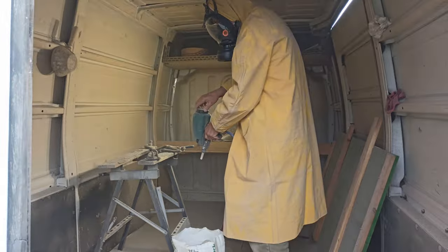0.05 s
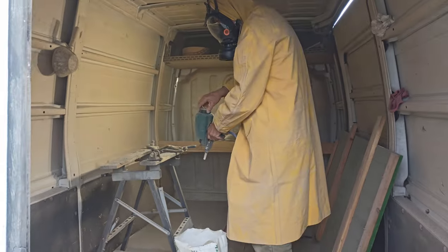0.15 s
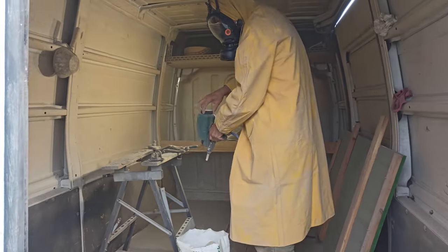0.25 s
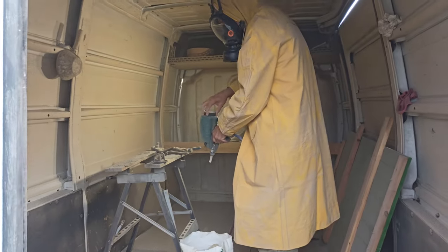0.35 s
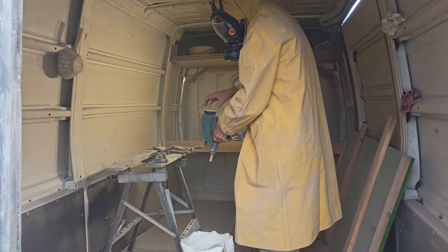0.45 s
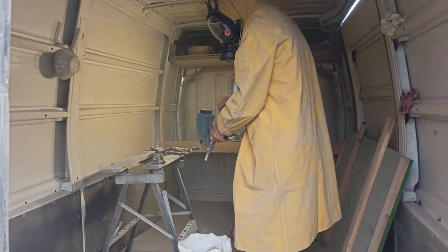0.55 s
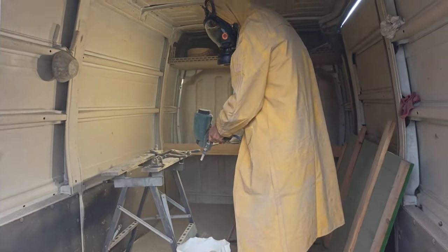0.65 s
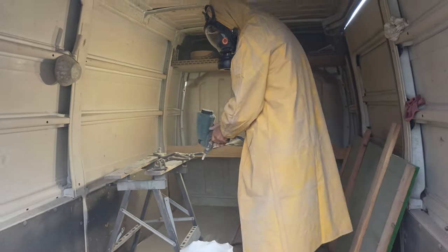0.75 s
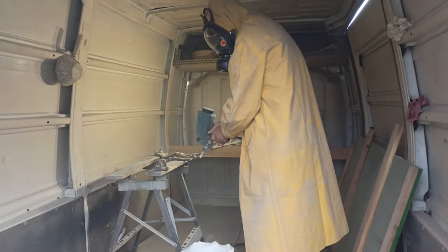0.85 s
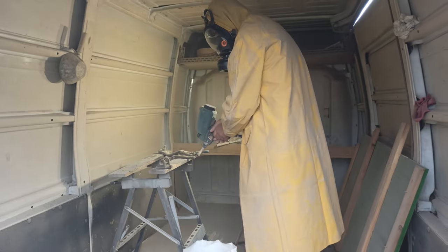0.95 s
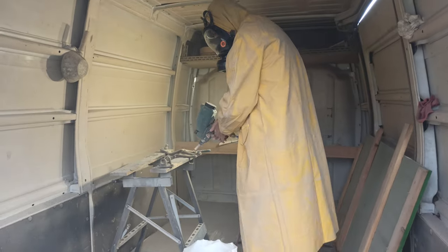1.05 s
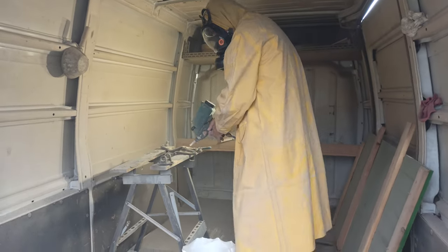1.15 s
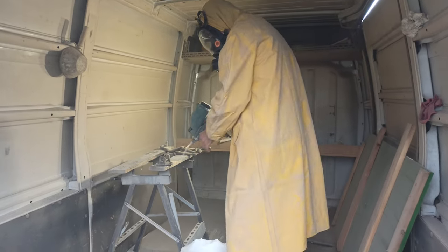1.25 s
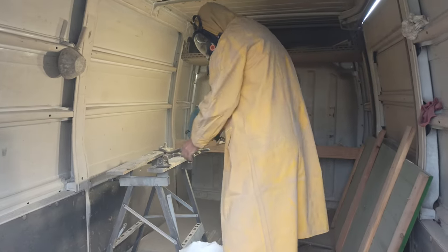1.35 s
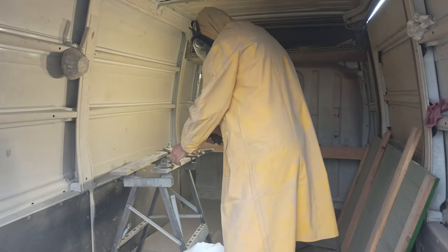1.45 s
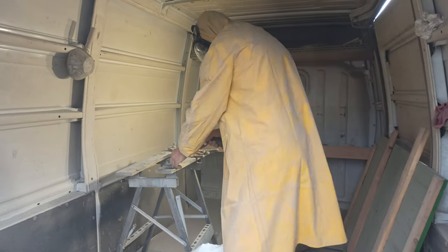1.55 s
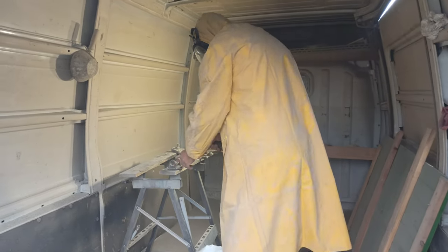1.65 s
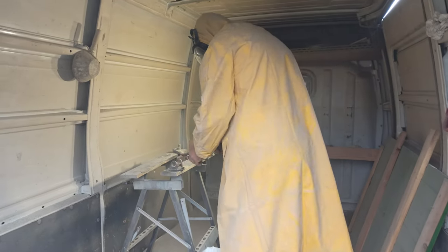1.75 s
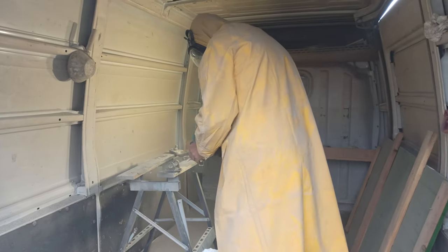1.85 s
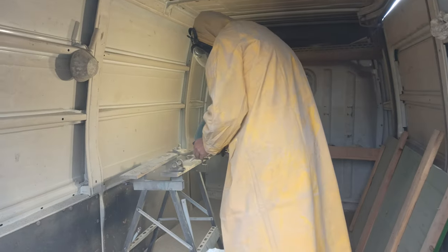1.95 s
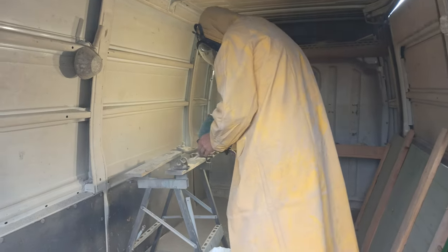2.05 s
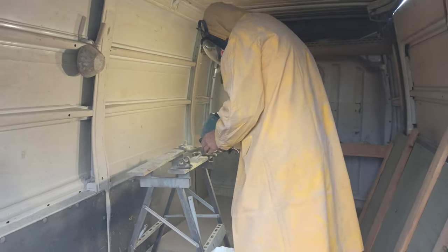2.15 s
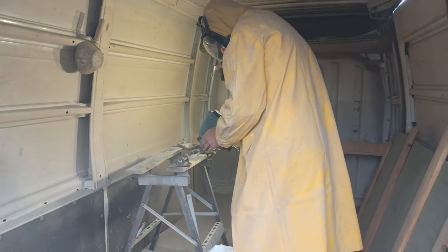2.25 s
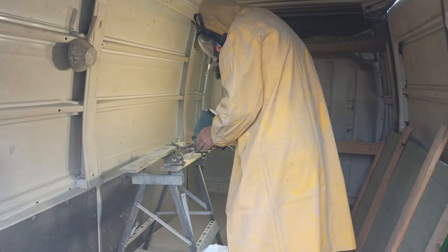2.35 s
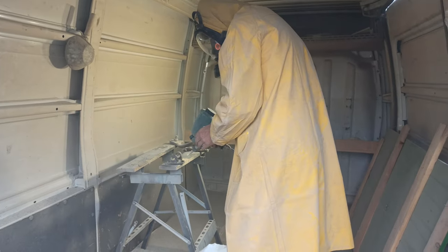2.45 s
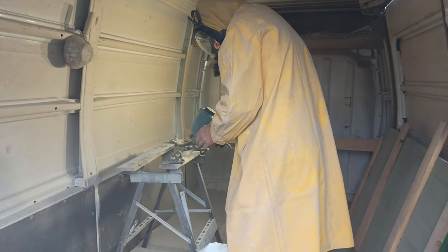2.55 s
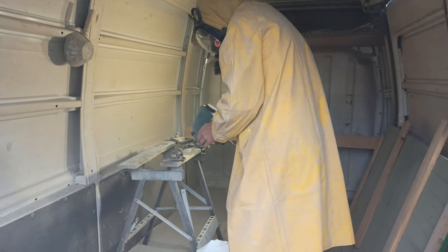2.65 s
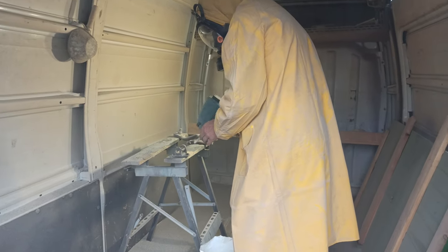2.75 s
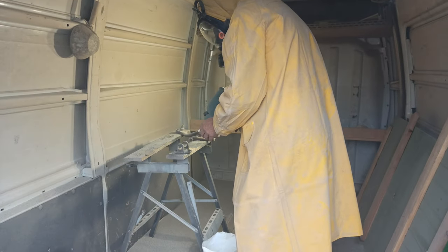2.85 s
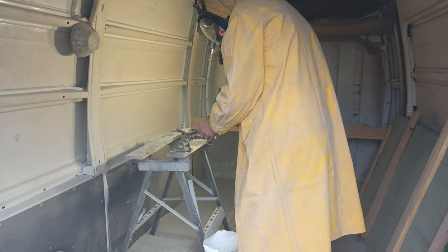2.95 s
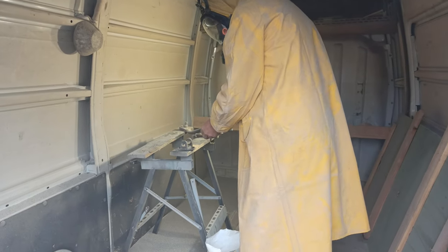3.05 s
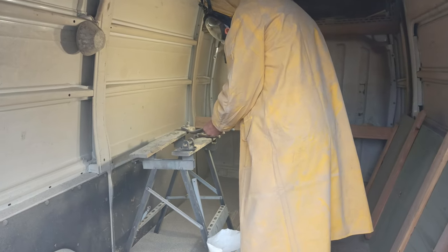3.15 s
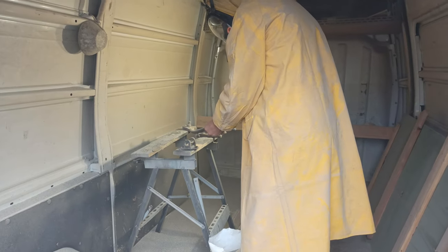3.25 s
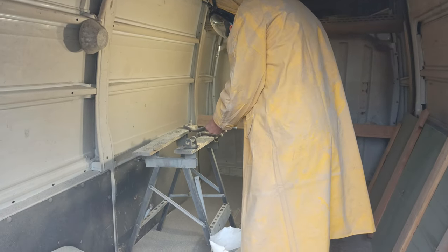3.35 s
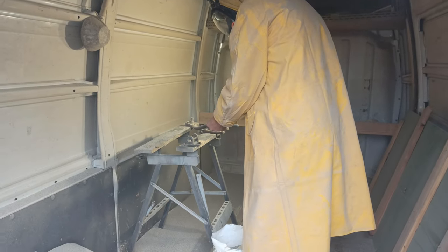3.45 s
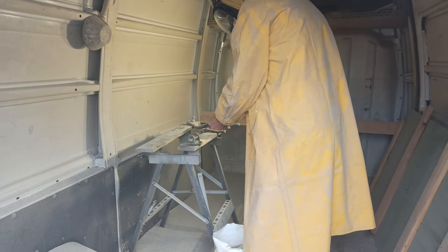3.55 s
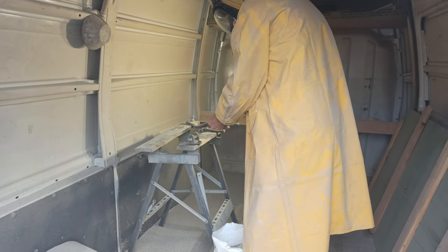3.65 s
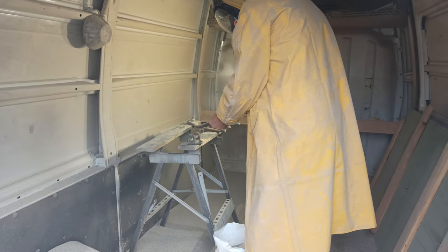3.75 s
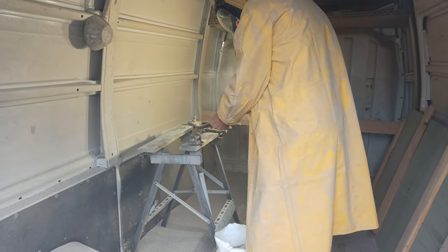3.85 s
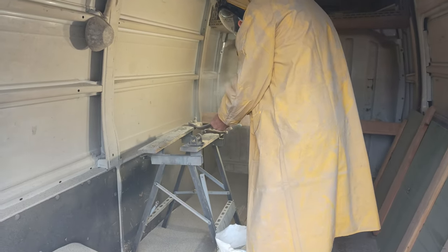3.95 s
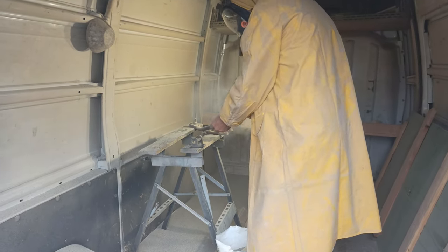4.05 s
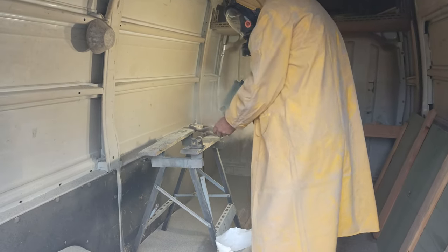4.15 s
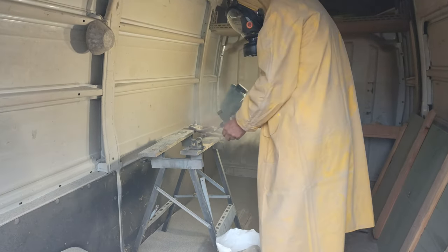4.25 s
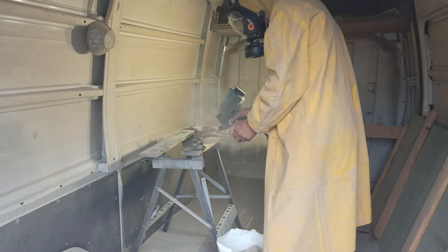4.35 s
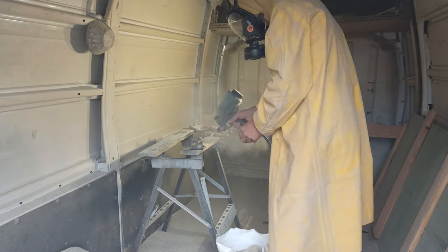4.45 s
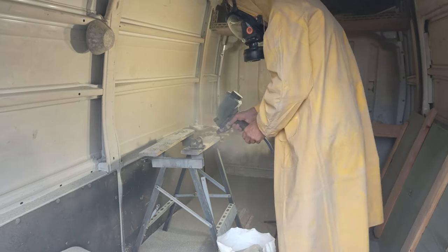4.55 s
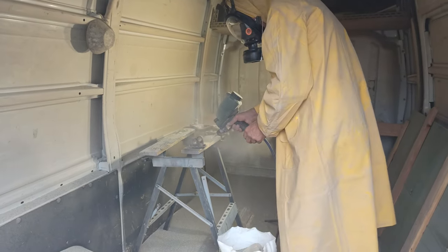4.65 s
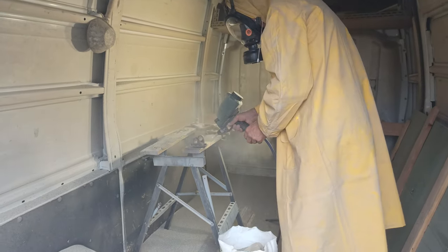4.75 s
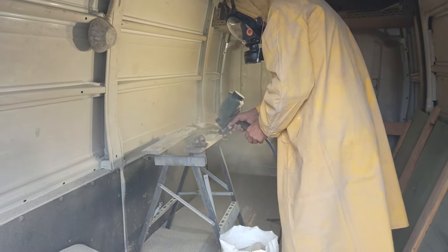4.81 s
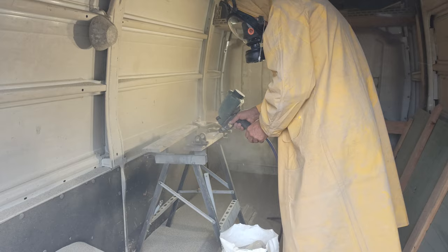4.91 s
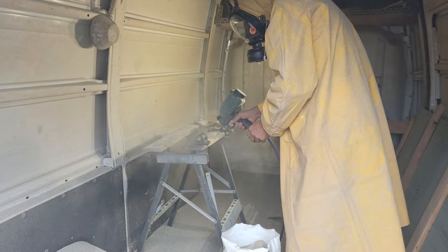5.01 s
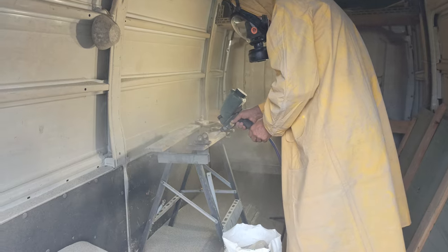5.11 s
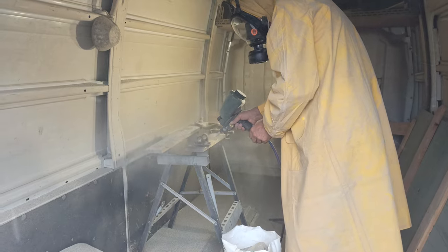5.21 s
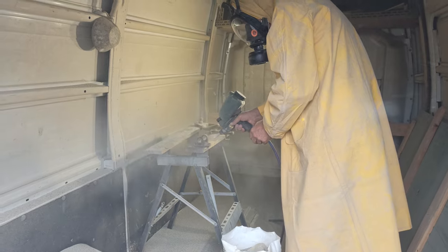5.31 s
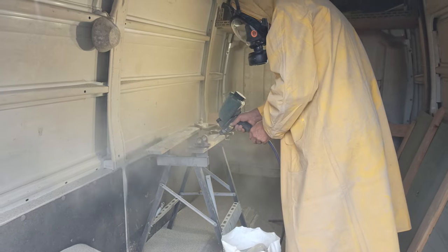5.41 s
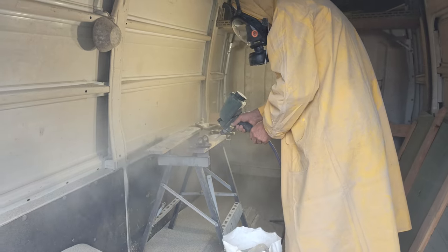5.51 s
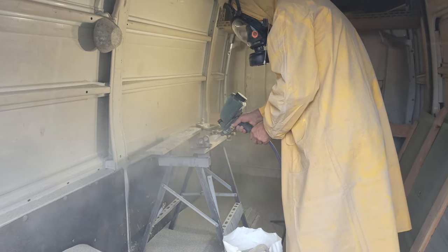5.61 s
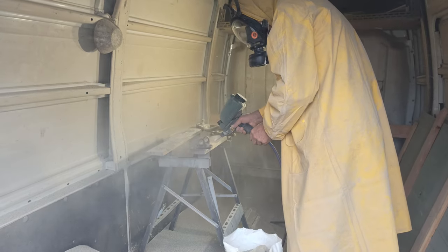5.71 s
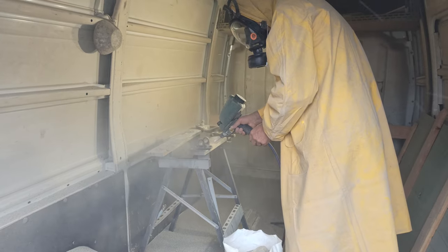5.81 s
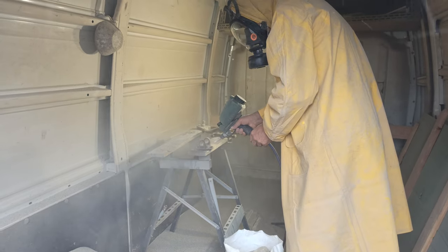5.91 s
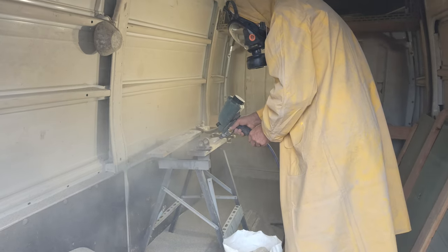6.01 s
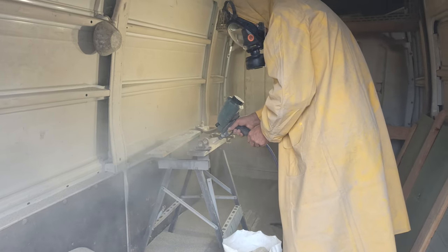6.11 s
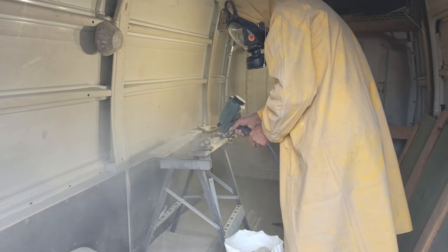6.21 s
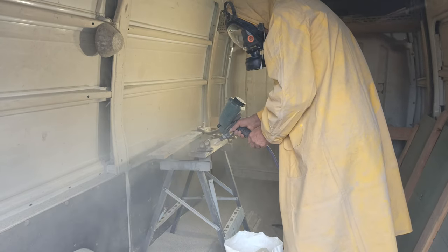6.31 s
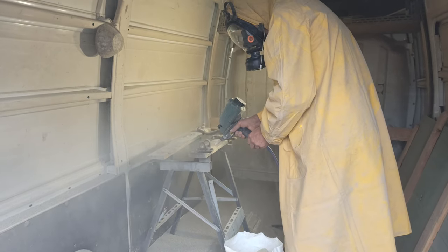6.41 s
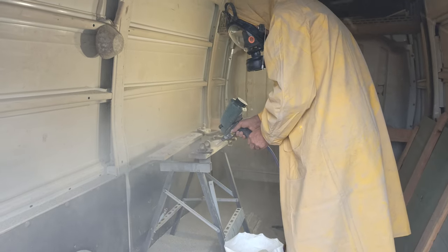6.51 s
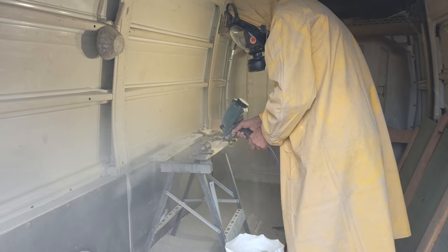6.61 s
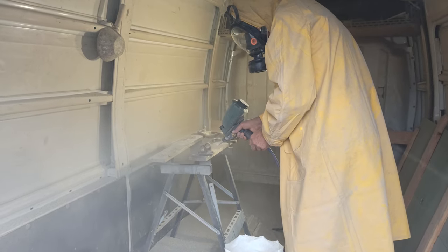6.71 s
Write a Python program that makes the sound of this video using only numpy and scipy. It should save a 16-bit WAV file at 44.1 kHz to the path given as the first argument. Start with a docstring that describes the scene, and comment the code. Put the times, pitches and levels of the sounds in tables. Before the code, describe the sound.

A stiff coat rustles and a hose scrapes inside a metal van, then a sandblasting gun hisses harshly in three bursts, the last sustained.

```python
"""Inside an empty panel van a work coat rustles, the air hose drags, and the gun and feet knock softly.
A hopper-fed sandblasting gun then fires at a steel part: one blast, a very short one, and a long one that
lasts to the end, with more handling between. Each pull thumps the panels; turbulent noise makes the
jet's hiss, and dense random impacts of grit make the roar, rasp and sizzle on the steel.
Filtered noise makes the handling, the hose adds a wavering sine, and a low drone lies behind."""
import sys
import numpy as np
from scipy import signal
from scipy.fft import rfft, irfft, next_fast_len
from scipy.io import wavfile
from scipy.ndimage import map_coordinates

SR = 44100
rng = np.random.default_rng(int(sys.argv[2]) if len(sys.argv) > 2 else 0)


def wav_out(sig):
    """Save sig, one row per channel (or a flat mono array), as 16-bit PCM at SR to the path in sys.argv[1]."""
    wavfile.write(sys.argv[1], SR, np.round(np.clip(np.atleast_2d(sig).T, -1, 1) * 32767).astype(np.int16))


N = 298557
TIME = np.arange(N) / SR   # s

# bands in which the layers are brought to rms 1: low f/Hz, high f/Hz
PANEL_BAND, ROAR_BAND = (60, 300), (500, 3000)
RASP_BAND, SIZZLE_BAND = (3000, 4750), (11600, 15600)

# spectrum of the finest grit noise and of the leaking valve: f/Hz, relative density/dB
SIZZLE_SPECTRUM = [(6000, -33.5), (9000, -5), (11600, -3.5), (12600, -6), (13200, 1), (14500, -3.5),
                   (16000, -0.5)]


def from_db(db):
    """Amplitude ratio: 20 dB is a factor of ten."""
    return 10 ** (np.asarray(db) / 20)


def bins(size):
    """Discrete Fourier frequencies in Hz, held to at least 1 Hz for the logarithm."""
    return np.maximum(np.arange(size // 2 + 1) * SR / size, 1)


def at_hz(points, hz):
    """Spectral interpolation: level in dB, linear on a log-frequency axis."""
    f, db = np.transpose(points)
    return np.interp(np.log(hz), np.log(f), db)


def gain_curve(rows, t):
    """Amplitude modulation: levels joined by straight lines in dB, as a gain at times t."""
    s, db = np.transpose(rows)
    return from_db(np.interp(t, s, db))


def wander(size, rate_hz):
    """Low-pass random process: slow chance of spread 1 that changes at about rate_hz."""
    padded = next_fast_len(size)
    spectrum = rfft(rng.standard_normal(padded))
    slow = irfft(spectrum / (1 + (bins(padded) / rate_hz) ** 2), padded)[:size]
    return (slow - slow.mean()) / slow.std()


def flutter(size, rate_hz, depth_db):
    """Random amplitude modulation: a gain that wanders at about rate_hz."""
    return from_db(depth_db * wander(size, rate_hz))


def grains(size, per_s, spread_db):
    """Shot noise: random tiny impacts of either sign and uneven strength."""
    hit = rng.random(size) < per_s / SR
    strength_db = spread_db * np.minimum(rng.exponential(1, size), 5)
    return hit * rng.choice([-1, 1], size) * from_db(strength_db)


def coloured(x, spectrum, band, standing=0):
    """Linear filtering by a spectrum and a share of the standing waves; rms 1 inside the band."""
    # standing waves between the part and the van walls, peaks and nulls: f/Hz, width/Hz, level/dB
    modes = [(345, 51, 6), (465, 77, 4.5), (720, 67, 2), (846, 40, 5), (1004, 20, 6.5), (1106, 35, 2),
             (1577, 92, 3), (1870, 60, -3), (2010, 51, 4), (2140, 64, -1.5), (2210, 95, 4), (2770, 45, 5),
             (3460, 100, -0.5), (3660, 90, 3.5), (4280, 43, 7), (4365, 90, -9), (4600, 120, 3.5),
             (5506, 40, 9.5), (5730, 45, 3.5), (5850, 120, 7.5), (6180, 110, -3.5), (6350, 46, 6.5),
             (6580, 170, 6), (6900, 36, 3.5), (6890, 37, 7), (7034, 74, 10), (7530, 49, -0.5),
             (7400, 64, 5), (8230, 89, 2), (13690, 100, -2.5)]
    size = next_fast_len(len(x))
    hz = bins(size)
    db = at_hz(spectrum, hz)
    if standing:
        db = db + standing * sum(height / (1 + (2 * (hz - f) / width) ** 4) for f, width, height in modes)
    shaped = rfft(x, size) * from_db(db)
    inside = irfft(shaped * (hz > band[0]) * (hz < band[1]), size)[:len(x)]
    return irfft(shaped, size)[:len(x)] / (inside.std() + 1e-12)


def envelope(t, start, rise, held, t60):
    """Exponential decay: swells from start, holds, then dies away by 60 dB in t60."""
    attack = np.clip((t - start) / rise, 0, 1) ** 2
    decay = np.clip((t - start - rise - held) / t60, 0, 2)
    return attack * from_db(-60 * decay)


def strokes(shapes, levels_db):
    """Incoherent addition: overlapping movements add in power, one gain curve a level column."""
    power = np.array([envelope(TIME, *shape) ** 2 for shape in shapes])
    return np.sqrt(from_db(levels_db).T ** 2 @ power)


def wavering_note(hz, swing_hz):
    """Frequency modulation: a sine of rms 1 whose pitch wanders."""
    pitch_hz = hz + swing_hz * wander(N, rate_hz=11.9)
    return np.sqrt(2) * np.sin(2 * np.pi * np.cumsum(pitch_hz) / SR)


def outdoors():
    """Stationary broadband noise: a quiet, mostly low background."""
    # spectrum: f/Hz, relative density/dB
    ambience = [(20, -36.5), (45, -12.5), (85, -2), (140, -3), (210, -2), (280, -6), (500, -7),
                (1000, -13.5), (3000, -27), (16000, -33)]
    return from_db(-63.0) * coloured(rng.standard_normal(N), ambience, PANEL_BAND)


def far_drone():
    """Narrow low-frequency noise under a slow gain: a far drone."""
    # level of the drone: t/s, level/dB
    drone_level = [(0, -67.5), (1.4, -66.5), (2, -74.5), (6.7, -74.5)]
    # spectrum: f/Hz, relative density/dB
    rumble = [(35, -22), (60, -18), (85, -3.5), (105, -6), (160, -25), (400, -53)]
    return gain_curve(drone_level, TIME) * coloured(rng.standard_normal(N), rumble, PANEL_BAND)


def coat():
    """Frictional shot noise: stiff cloth crinkles and slides over itself."""
    # movements of the coat: start t/s, rise/s, held/s, t60/s, crinkle level/dB, swish level/dB
    rustles = [(-.02, .02, .08, .9, -60, -56.5), (.1, .06, .08, 0.55, -61, -65),
               (.215, 0.063, .035, 0.27, -47.5, -49), (.38, 0.044, .1, .5, -61, -83),
               (.5, 0.051, 0.25, 0.62, -55.5, -64), (.9, 0.11, .05, .5, -59, -62),
               (.97, .13, .085, 0.44, -51.5, -52.5), (1.21, 0.046, .05, 0.44, -56.5, -61),
               (1.415, 0.013, 0.32, .55, -55.5, -59.5), (1.77, .07, .02, .2, -60.5, -47.5),
               (2.8, 0.13, 0.12, 0.9, -52.5, -52), (3.36, 0.037, 0.036, 1.4, -68.5, -68.5),
               (4.04, 0.12, .17, 0.65, -53, -51.5), (4.28, 0.048, .03, 0.68, -48.5, -56),
               (4.34, 0.078, .21, 0.49, -52.5, -48), (4.5, 0.027, .012, .2, -42, -45)]
    # crinkle spectrum: f/Hz, relative density/dB
    crinkle_spectrum = [(100, -7.5), (300, 1), (450, 2), (570, 3.5), (850, 3.5), (1200, 0.5), (1800, 1),
                        (2400, -1.5), (3500, 0.5), (4700, -2.5), (7000, -5.5), (12000, -25.5)]
    # swish spectrum: f/Hz, relative density/dB
    swish_spectrum = [(2000, -24), (4500, -5.5), (6200, -3), (7000, -3), (8500, -9), (12000, -19.5),
                      (16000, -19)]
    crinkle = coloured(grains(N, per_s=5400, spread_db=1.5), crinkle_spectrum, (1000, 4500))
    crinkle = crinkle * flutter(N, rate_hz=36, depth_db=1.5)
    swish = coloured(grains(N, per_s=15000, spread_db=3.0), swish_spectrum, (6100, 15600))
    crinkle_gain, swish_gain = strokes([row[:4] for row in rustles], [row[4:] for row in rustles])
    return crinkle_gain * crinkle + swish_gain * swish


def hose():
    """Friction and resonance: the hose rubs along in fits with a hollow note."""
    # drags of the hose: start t/s, held/s, rubbing level/dB, clear note level/dB
    drags = [(.01, .12, -66, -62), (.25, .05, -62, -62), (.56, .1, -62, -64), (.88, 0.27, -60.5, -58),
             (1.24, 0.0284, -57, -67), (1.548, .13, -62, -64), (3.08, 0.14, -66, -68),
             (3.95, 0.29, -61, -72)]
    # rubbing spectrum: f/Hz, relative density/dB
    rub_spectrum = [(300, -34), (490, -18.5), (535, -3.5), (552, -1.5), (580, 3), (630, -17), (860, -10),
                    (1200, -33.5)]
    rise_s, t60_s = 0.039, 0.34
    rub = coloured(rng.standard_normal(N), rub_spectrum, (515, 610))
    note = wavering_note(hz=550, swing_hz=13)
    shapes = [(start, rise_s, held, t60_s) for start, held, *_ in drags]
    rub_gain, note_gain = strokes(shapes, [row[2:] for row in drags])
    return rub_gain * rub + note_gain * note


def knocks():
    """Damped resonance: each knock is a quick swell of noise that dies away in one broad band."""
    # handling knocks, footfalls and trigger thumps: t/s, level/dB, f/Hz, width/Hz, t60/s
    blows = [(.248, -44.5, 3530, 600, 0.46), (.255, -52, 1110, 150, .25), (.268, -43.5, 1810, 260, 0.54),
             (.275, -49, 610, 90, 0.25), (1.283, -46, 640, 220, 0.15), (1.42, -48, 2400, 3500, .07),
             (1.424, -52, 130, 130, .45), (1.470, -56, 75, 50, 0.5), (1.786, -38, 1920, 450, 0.05),
             (1.866, -40, 128.6, 110.8, 0.11), (3.636, -35.5, 730, 300, 0.11),
             (3.645, -34.5, 377, 280, 0.2), (3.645, -42, 112.3, 110, 0.19), (4.335, -46, 1750, 400, 0.13),
             (4.450, -53, 100, 70, 0.43), (4.505, -43, 140, 170, .16), (4.533, -46, 1400, 1200, .14),
             (4.540, -42, 105, 70, 0.45), (4.614, -48, 118, 25, .3), (4.664, -36.5, 120, 70, 0.083)]
    out = np.zeros(N)
    t = TIME[:SR // 2]
    for s, level_db, hz, width_hz, t60 in blows:
        # edges whose geometric mean is the pitch
        edges = np.hypot(hz, width_hz / 2) + np.array([-width_hz, width_hz]) / 2
        resonance = signal.butter(2, edges, "band", fs=SR, output="sos")
        ring = signal.sosfilt(resonance, rng.standard_normal(SR))[-len(t):]
        fade = from_db(-60 * t / t60) * np.minimum(t / .003, 1)
        ring = ring / np.sqrt(np.average(ring ** 2, weights=fade ** 2))   # rms 1 while it sounds
        at = round(s * SR)
        out[at:at + len(t)] += from_db(level_db) * ring * fade
    return out


def leak():
    """Turbulent flow noise: air slips past the half-closed valve in a thin hiss between the pulls."""
    # leaks: start t/s, held/s, level/dB
    slips = [(2.83, .17, -64), (4.1, 0.44, -58.5)]
    rise_s, t60_s = 0.04, .7
    gain = sum(from_db(db) * envelope(TIME, start, rise_s, held, t60_s) for start, held, db in slips)
    return gain * coloured(rng.standard_normal(N), SIZZLE_SPECTRUM, SIZZLE_BAND)


def edge_notes():
    """Resonant filtering: two airy notes of the steel, near 3.1 and 1 kHz, swell while the jet stays on it."""
    # level of the upper note: t/s, level/dB
    note_level = [(4.67, -100), (4.75, -49), (5.6, -46), (5.95, -37.5), (6.75, -40)]
    # upper note: f/Hz, relative density/dB
    upper_spectrum = [(2500, -33), (2900, -8), (3040, -7), (3180, -2.5), (3320, -13), (3800, -35)]
    # lower note: f/Hz, relative density/dB
    lower_spectrum = [(700, -35), (940, -10), (1012, 0), (1070, -10), (1400, -35)]
    upper = coloured(rng.standard_normal(N), upper_spectrum, RASP_BAND)
    lower = coloured(rng.standard_normal(N), lower_spectrum, ROAR_BAND)
    lower_db = -7   # against the upper note
    return gain_curve(note_level, TIME) * (upper + from_db(lower_db) * lower)


def blast(pull, bite):
    """Jet turbulence and impact noise: one pull, whose uneven feed shakes roar, rasp and sizzle together."""
    # spectra of the air jet, the roar, the rasp and the panels: f/Hz, relative density/dB
    jet_spectrum = [(400, -42.5), (1000, -37.5), (2500, -25.5), (4000, -13), (6000, 0), (7000, 0.5),
                    (8500, -1.5), (11000, -10.5), (16000, -30)]
    roar_spectrum = [(150, -33), (300, -22), (450, -7), (700, -2), (1000, 1.5), (1600, 2), (2400, 0),
                     (3200, -1), (4500, -12.5), (6000, -15), (10000, -23.5)]
    rasp_spectrum = [(1500, -35), (2500, -14), (3100, -3), (3800, -0.5), (4600, 2), (5500, -1),
                     (7000, -11.5), (10000, -26)]
    panel_spectrum = [(25, -32.5), (50, -15), (110, 0.5), (220, -1.5), (450, -9), (1200, -29)]
    # a square hit roars more and sizzles less; close to the steel the jet is slightly muffled (dB per dB of rasp)
    roar_per_bite, sizzle_per_bite, jet_per_bite = .4, -.6, -.1
    rasp_share_db = -0.5   # the grit's share of the rasp; the jet supplies the rest
    sizzle_decay_share = 0.76   # the sizzle dies first: its t60 as a share of the air's
    roar_lag_s = 0.041   # the last grit strikes the steel a little longer

    (start, rise, held, t60, swell, jet_db, roar_db, sizzle_db,
     buffet_db, buffet_growth, standing, hollow) = pull
    live = (TIME >= start) & (TIME < start + rise + held + t60)
    t, out = TIME[live], np.zeros(N)
    size = len(t)
    from_middle = np.minimum(t - start - rise, held) - held / 2   # s from the middle of the pull
    flow_db = swell * from_middle
    rasp_db = np.interp(t, *np.transpose(bite))
    bite_db = rasp_db - rasp_db[t < start + rise + held].mean()

    jet = coloured(rng.standard_normal(size), jet_spectrum, (6100, 7700), standing)
    jet = jet * flutter(size, rate_hz=100, depth_db=0.8)
    panels = coloured(rng.standard_normal(size), panel_spectrum, PANEL_BAND, standing)
    roar = coloured(grains(size, per_s=14000, spread_db=2.0), roar_spectrum, ROAR_BAND, standing)
    # at some angles of the gun the middle of the roar cancels
    middle_band = signal.butter(1, [922, 1300], "band", fs=SR, output="sos")
    roar = roar - hollow * signal.sosfilt(middle_band, roar)
    rasp = coloured(grains(size, per_s=14000, spread_db=2.5), rasp_spectrum, RASP_BAND, standing)
    sizzle = coloured(grains(size, per_s=18000, spread_db=3.0), SIZZLE_SPECTRUM, SIZZLE_BAND, standing)

    feed = flutter(size, rate_hz=22, depth_db=0.55)
    bleeding = envelope(t, start, rise, held, t60)
    full_pressure = envelope(t, start, rise, held, sizzle_decay_share * t60)
    striking = envelope(t, start, rise, held + roar_lag_s, t60)

    rasp_gain = from_db(rasp_db + rasp_share_db) * bleeding
    roar_gain = from_db(roar_db + roar_per_bite * bite_db) * striking
    sizzle_gain = from_db(sizzle_db + flow_db + sizzle_per_bite * bite_db) * full_pressure
    grit = rasp_gain * rasp + roar_gain * roar + sizzle_gain * sizzle
    jet_gain = from_db(jet_db + flow_db + jet_per_bite * bite_db) * bleeding
    panel_gain = from_db(buffet_db + buffet_growth * from_middle) * full_pressure
    out[live] = jet_gain * jet + panel_gain * panels + feed * grit
    return out


def swaying(x):
    """Comb filtering: wall bounces lengthen and shorten with the hand, so the hiss slowly shifts colour."""
    # bounces off the nearest walls: extra delay/s, its swing as the gun moves/s, level/dB
    bounces = [(.0031, .00012, -15), (.0074, 0.000191, -20), (0.0129, .00025, -18), (0.0184, 0.000296, -14)]
    out, power = x, 1
    for delay, swing, level_db in bounces:
        lag = delay + swing * wander(N, rate_hz=0.32)
        out = out + from_db(level_db) * map_coordinates(x, [(TIME - lag) * SR], order=3)
        power += from_db(level_db) ** 2
    return out / np.sqrt(power)


def van(x, wet_db, t60):
    """Reverberation: bare steel walls close by add a dense, short ring at about the same loudness."""
    t = TIME[:SR // 2]
    tail = rng.standard_normal(len(t)) * from_db(-60 * t / t60) * (t > .003)
    ring = signal.fftconvolve(x, tail / np.linalg.norm(tail))[:N]
    wet = from_db(wet_db)
    return (x + wet * ring) / np.sqrt(1 + wet ** 2)


def scene():
    """Superposition: quiet background, handling and gun, the last two ringing in the van; heard in mono."""
    # trigger pulls: opens t/s, rise/s, held/s, t60/s as the air bleeds away, swell of the air flow/(dB/s),
    # air jet level/dB, roar on the steel level/dB, grit sizzle level/dB, buffeting of the panels level/dB,
    # its growth/(dB/s), colour from the standing waves (0-1), hollow in the roar (0-1)
    pulls = [(1.855, 0.015, 0.82, .35, -0.5, -24.5, -34, -25, -52.5, 6.5, .54, 0.13),
             (3.623, 0.024, 0.17, .42, 49, -28, -41, -33, -57.5, 0, 0.4, 0.66),
             (4.655, .017, 2.1, .35, 0, -23.4, -33, -28.5, -59, -1, 0.97, 0.1)]
    # level of the rasp, which rises as the jet bites squarely into the steel, one curve a pull: t/s, level/dB
    first_bite = [(1.88, -29.5), (1.93, -25), (2.04, -30), (2.15, -27.5), (2.3, -31.5), (2.45, -31),
                  (2.6, -31), (2.67, -29.6)]
    second_bite = [(3.66, -37.5), (3.81, -30)]
    third_bite = [(4.71, -25.5), (4.85, -27.5), (5.03, -26.5), (5.3, -28.0), (5.65, -29), (5.9, -29),
                  (6.1, -29), (6.4, -28.1), (6.68, -28.5)]
    bites = [first_bite, second_bite, third_bite]

    background = outdoors() + far_drone()
    handling = coat() + hose() + knocks()
    blasts = sum(blast(pull, bite) for pull, bite in zip(pulls, bites))
    gun = swaying(leak() + edge_notes() + blasts)
    mono = background + van(handling, wet_db=-9.0, t60=0.14) + van(gun, wet_db=-12.5, t60=0.24)
    return np.array([mono, mono])


def record(dry):
    """Transducer response: one microphone with an uneven treble, cut steeply at the top."""
    # thin bass and stepped treble: f/Hz, level/dB
    microphone = [(25, -6), (70, 0), (4700, 0), (4830, -7), (6050, -7.5), (6200, 1.5), (7630, 0.5),
                  (7750, -5.5), (8480, -4.5), (8650, -18), (11450, -19), (11600, 0.5)]
    cutoff_hz = 15750
    size = next_fast_len(N + SR // 4)
    hz = bins(size)
    low_pass = np.clip((cutoff_hz - hz) / 150 + .5, 0, 1)
    response = from_db(at_hz(microphone, hz)) * low_pass
    return irfft(rfft(dry, size) * response, size)[:, :N]


dry = scene()
out = record(dry)
wav_out(out)
```